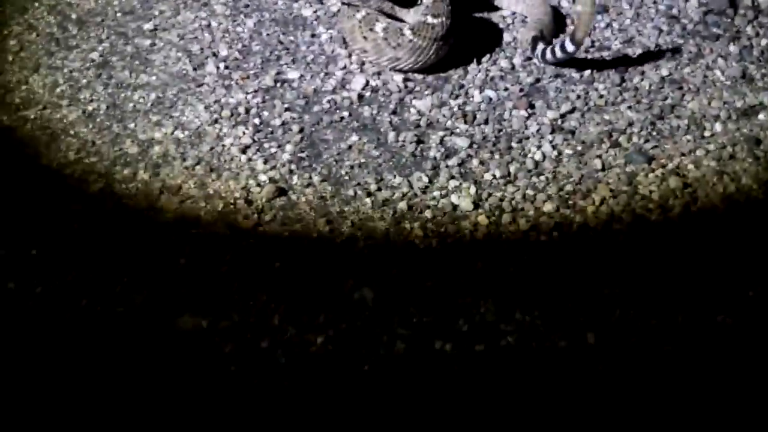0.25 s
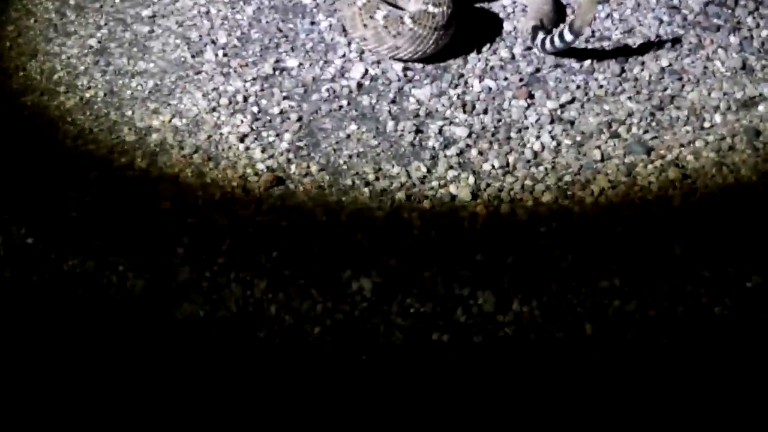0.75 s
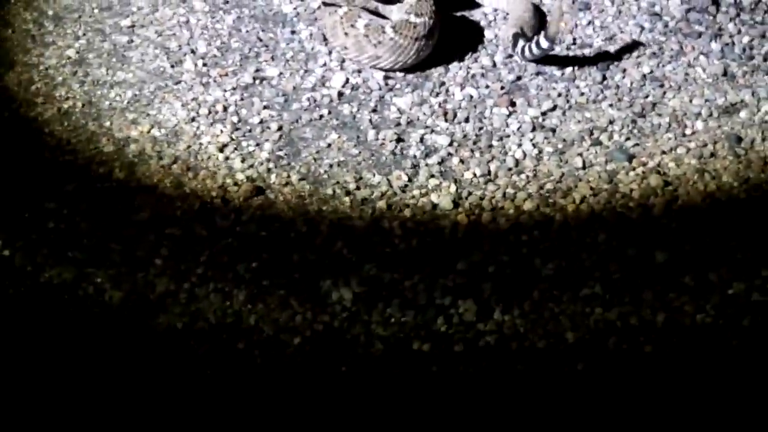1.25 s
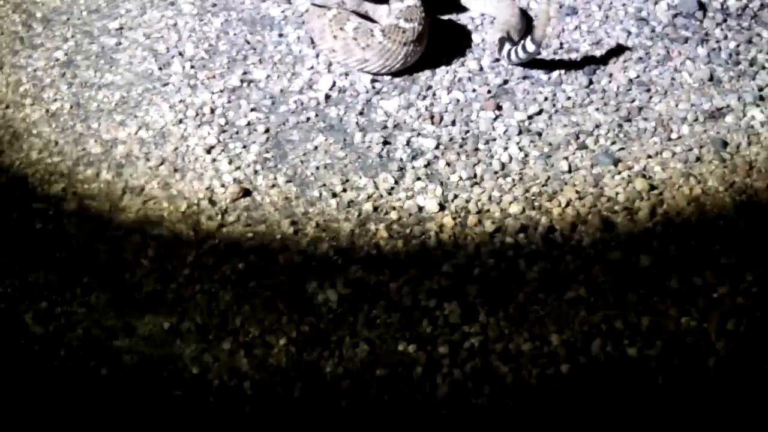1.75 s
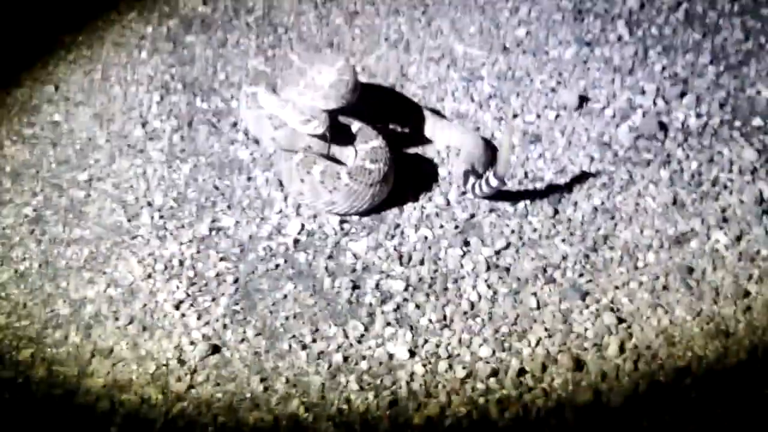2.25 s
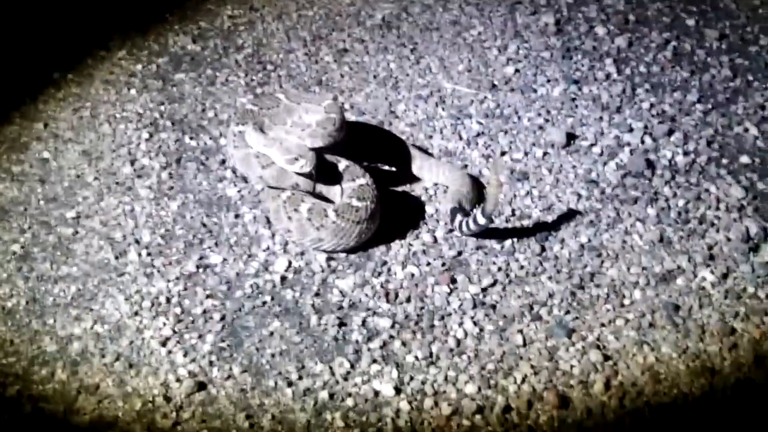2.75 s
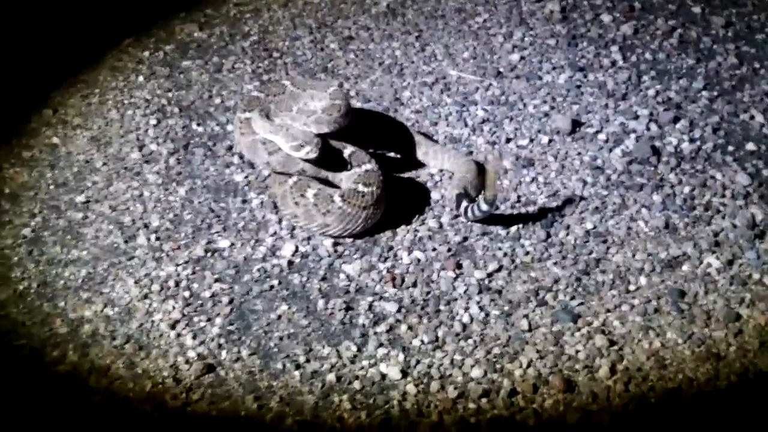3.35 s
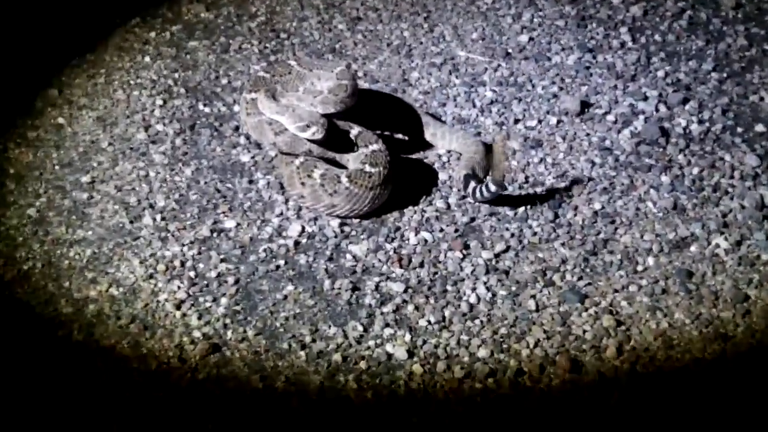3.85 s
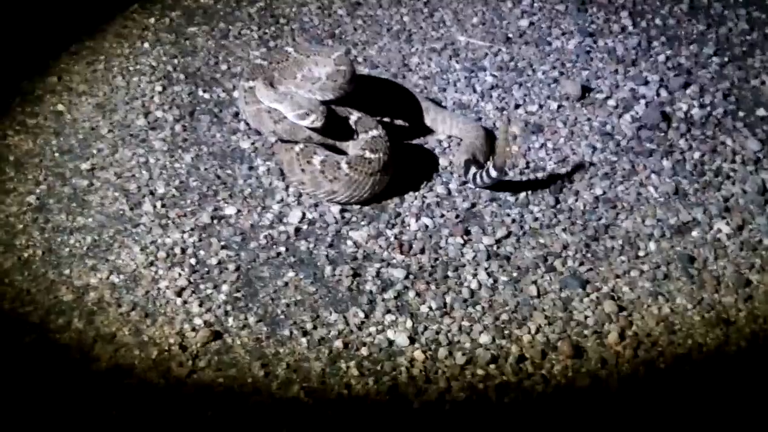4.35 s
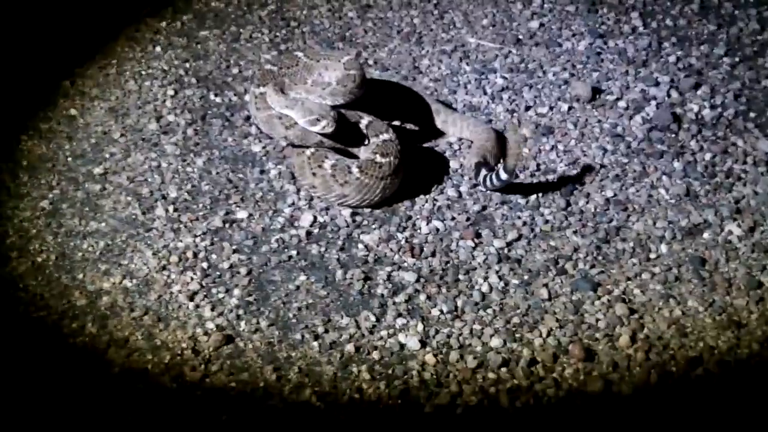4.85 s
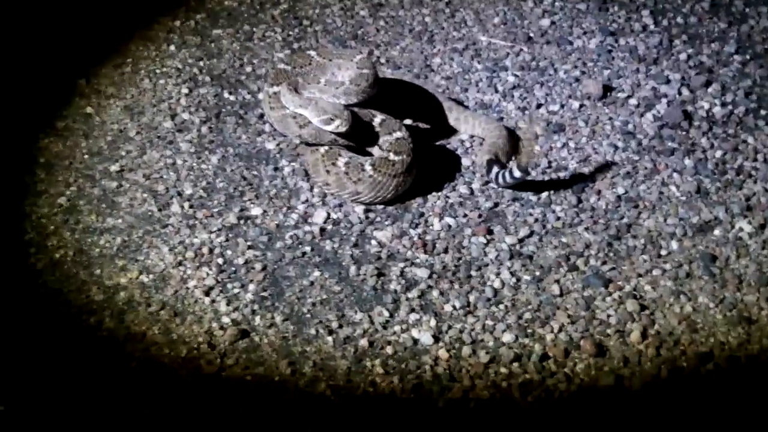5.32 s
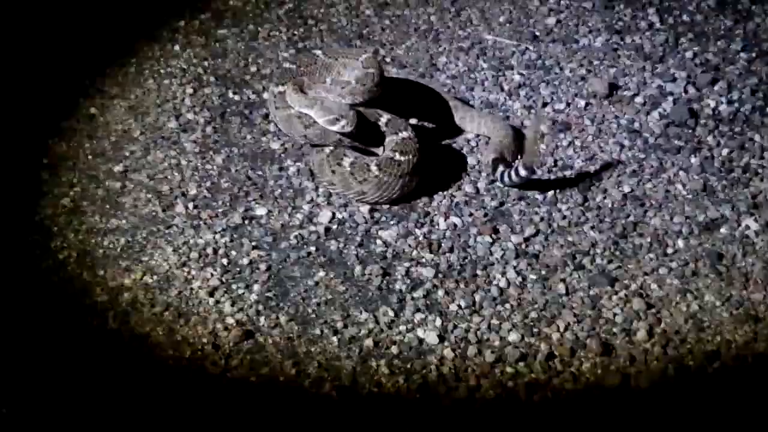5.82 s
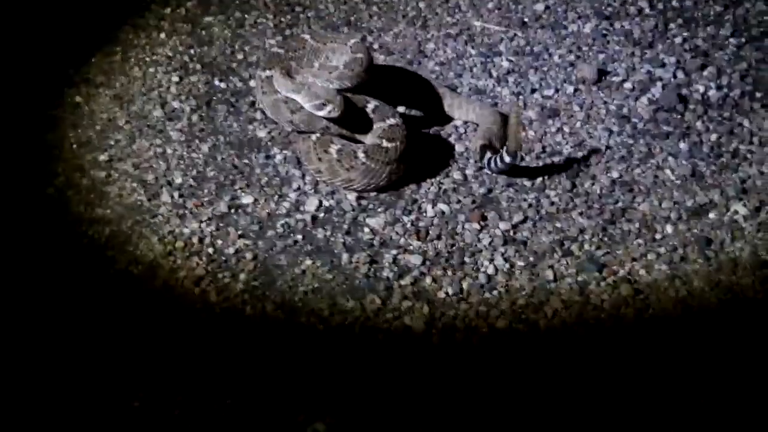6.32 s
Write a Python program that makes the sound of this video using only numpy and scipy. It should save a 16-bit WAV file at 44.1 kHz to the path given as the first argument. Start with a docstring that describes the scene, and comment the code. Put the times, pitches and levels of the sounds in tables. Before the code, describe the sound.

A rattlesnake on gravel buzzes its tail without stopping, a loud, dry, sizzling rattle. It starts dense and nearly smooth, then from about the middle turns into a rapid flutter of separate bursts, slightly duller. A few gravel clicks and soft thuds come near the start, with small crunches toward the end. Quiet night air and a barely audible distant idling engine lie beneath. Close, dry outdoor pickup with no echo.

```python
"""A coiled rattlesnake shakes its tail on gravel at night: noise bursts of clashing hollow segments, one per swing.
At first the bursts run together, later deeper gaps open between them. The microphone tilts toward the snake early on.
Gravel clicks and crunches under a shifting foot, as short puffs of noise and low damped thuds.
Far off a parked engine idles, a few wavering sines; the night air is a faint rumble and hiss of shaped noise."""
import sys
import numpy as np
from scipy import signal
from scipy.fft import rfft, irfft, next_fast_len
from scipy.io import wavfile
from scipy.ndimage import uniform_filter1d, map_coordinates

SR = 44100
rng = np.random.default_rng(int(sys.argv[2]) if len(sys.argv) > 2 else 0)


def put_to_file(sound):
    """Save the sound as 16-bit audio at rate SR, in the file named by the first command-line argument."""
    columns = np.atleast_2d(sound).T  # one column per channel
    safe = np.clip(columns, -1, 1)
    whole_steps = np.round(safe * 32767)
    wavfile.write(sys.argv[1], SR, whole_steps.astype(np.int16))


N = 290178  # samples


def amp(db):
    """Amplitude ratio of a level in dB."""
    return 10 ** (np.asarray(db) / 20)


def unit(x):
    """x brought to rms 1."""
    return x / np.sqrt(np.mean(x ** 2) + 1e-20)


def curves(rows):
    """One value per sample for each column after the time."""
    time_s, *columns = np.transpose(rows)
    return [np.interp(np.arange(N) / SR, time_s, column) for column in columns]


def wobble(rate):
    """A smooth random curve, rate knots a second."""
    coarse = np.arange(0, N + 32, 32)  # every 32nd sample is enough
    knots = rng.standard_normal(int(N * rate / SR) + 4)
    return np.interp(np.arange(N), coarse, map_coordinates(knots, [coarse * rate / SR]))


def filtered(x, response):
    """x times a response of frequency."""
    m = next_fast_len(N + 8192)
    return irfft(rfft(x, m) * response(np.fft.rfftfreq(m, 1 / SR)), m)[..., :N]


def coloured(x, points):
    """x shaped by (Hz, dB) points on a log axis, brought to rms 1."""
    f, db = np.transpose(points)
    return unit(filtered(x, lambda hz: amp(np.interp(np.log(hz + 1), np.log(f), db))))


def steady(db):
    """Gain that follows db while its rms over an eighth of a second stays even."""
    return amp(db) / np.sqrt(np.abs(uniform_filter1d(amp(2 * db), SR // 8)))


def clashes(per_s, scatter, spread_db, length):
    """Envelope of segments knocking one after another, unevenly spaced and of uneven strength."""
    order = np.arange(int(per_s * N / SR))
    shift, size = rng.uniform(-0.84, 1, (2, len(order)))
    at = np.clip((order + scatter * shift) * SR / per_s, 0, N - 1).astype(int)
    t = np.arange(-SR // 100, SR // 100) / SR
    swell = np.exp(-(2 * t / length) ** 2)
    energy = np.bincount(at, amp(2 * spread_db * size), N)
    return unit(np.sqrt(np.abs(signal.fftconvolve(energy, swell, "same"))))


# A narrow dip in the buzz, one row before and one after the microphone tilts:
# pitch_hz, half_width_hz (to 1/e), depth_share (0-1)
TILT_DIPS = [(4040, 92, 0.69), (4200, 61, 0.36)]
TILT_S, TILT_SCALE_S = 2.05, .15  # middle of the tilt, time scale of its smooth step


def microphone_tilt(walls):
    """Tilting the microphone toward the snake fades the buzz from one narrow dip to another."""
    before, after = [filtered(walls, lambda hz: 1 - depth * np.exp(-((hz - mid_hz) / width_hz) ** 2))
                     for mid_hz, width_hz, depth in TILT_DIPS]
    tilted = .5 + .5 * np.tanh((np.arange(N) / SR - TILT_S) / TILT_SCALE_S)
    return before + tilted * (after - before)


# How hard the tail shakes: time_s, level_db (segment walls), gap_depth_db (quiet between bursts)
SHAKE = [(0, -29.5, 1.5), (.25, -30.5, 6.5), (.52, -29, 2.5), (.67, -31.5, 5), (1.0, -29, 2.5),
         (1.25, -28.5, 2.5), (1.7, -28.5, 2.5), (2.0, -29.5, 5), (2.35, -30, 6.5), (2.66, -30, 5.5),
         (2.8, -30, 13), (2.97, -31, 8.5), (3.14, -30.5, 18), (3.36, -31, 10), (3.52, -29.5, 14.5),
         (3.63, -31, 7.5), (3.88, -31, 14.5), (4.1, -31, 8), (4.4, -31, 13.5), (4.7, -31.5, 9),
         (4.92, -31, 12), (5.64, -31, 6.5), (5.83, -32, 12), (6.0, -31, 8.5), (6.45, -30, 7.5),
         (6.58, -31, 10.5)]
# Tail swings done so far, before a small random shift, whole numbers near mid burst: time_s, swings
SWINGS = [(0.0, -0.08), (0.36, 9.57), (0.44, 11.42), (0.6, 16.25), (0.96, 25.95), (1.04, 28.66),
          (1.6, 45.51), (1.84, 51.67), (2.16, 60.89), (2.59, 73.34), (2.67, 75.84), (2.83, 80.24),
          (3.07, 87.5), (3.23, 92.18), (3.91, 112.49), (4.27, 122.36), (4.79, 137.98), (4.95, 142.47),
          (5.31, 153.4), (5.43, 156.72), (6.27, 182.43), (6.58, 190.95)]
# Colour of the segment walls' buzz: pitch_hz, level_db (relative); above 7 kHz it falls away steeply
WALL_MODES = [(1800, -34), (2900, -28), (3200, -15), (3470, -14), (3700, -5.5), (4050, -4), (4180, -5),
              (4600, -0.5), (5200, -1), (5700, -6), (6100, -9), (7200, -22.5), (7900, -65), (9000, -70)]
# Resonance of the hollow inside the segments: pitch_hz, level_db (relative)
HOLLOW_MODES = [(710, -32), (1200, -23), (1900, -14), (2150, -12.5), (2450, -3.5), (2850, -3.5),
                (3170, -2.5), (3500, -6.5), (4700, -5.5), (7900, -120)]
# Colour of the upper buzz: pitch_hz, level_db (relative); the treble has a narrow dip near 13.4 kHz
UPPER_MODES = [(7600, -45), (8050, -30), (8350, -9), (9000, -6), (10000, 0), (10900, -5), (12300, -8),
               (12750, -16), (13400, -27), (14200, -16), (14950, -14), (15400, -34)]
GAP_WANDER = .1  # the gap depth drifts by this share
BODY_DB, BODY_THINS = -11.5, .35  # hollow against the walls; dB lost per dB of gap depth


def rattle():
    """Segments clash densely through most of each swing and fall quiet at its turn."""
    (level_db, open_db), (swing,) = curves(SHAKE), curves(SWINGS)
    level_db = level_db + 0.61 * wobble(7)
    gap_db = open_db * np.clip(1 + GAP_WANDER * wobble(7), 0, 2)
    swing = swing - .01 + 0.026 * wobble(25)  # no two swings break alike

    quiet = .5 - .5 * np.tanh(5.2 * (np.cos(2 * np.pi * swing) + 0.31))
    lull = .5 + .5 * np.cos(2 * np.pi * (swing - .06))
    burst_db = -gap_db * quiet - 1.5 * lull ** 12 + 0.84 * wobble(40)  # a short lull splits the burst

    # the added constants are a steady hiss beneath the separate clashes
    contact = clashes(480, scatter=0.52, spread_db=6.0, length=0.0014)
    noise = rng.standard_normal((3, N))
    walls = coloured(noise[0] * (contact + 1.08) * steady(burst_db), WALL_MODES)
    walls = microphone_tilt(walls)
    hollow = coloured(noise[1] * (contact + 0.94) * steady(0.91 * burst_db), HOLLOW_MODES)
    upper = coloured(noise[2] * (contact + 2.7) * steady(0.71 * burst_db), UPPER_MODES)

    flicker_db = 1.3 * wobble(6.2)  # the treble flickers
    open_db = uniform_filter1d(open_db, SR)  # the colour follows the gaps slowly
    body_db = BODY_DB - BODY_THINS * open_db + 0.5 * wobble(6)
    upper_db = -21.5 - 0.24 * open_db + flicker_db  # duller once the gaps open
    return amp(level_db) * (walls + amp(body_db) * hollow + amp(upper_db) * upper)


# Grit scuffs and ticks: middle_s, level_db (rms, at full swell), centre_hz, spread_octaves, length_s
GRAVEL = [(0.3254, -36, 600, 3, .005), (.3262, -27, 2700, 0.49, .003), (0.354, -30, 2900, 0.28, .004),
          (0.377, -47, 620, 0.68, 0.0066), (0.391, -41.5, 900, 2.4, .0025), (.41, -51, 880, .6, .004),
          (1.892, -51.5, 100, 1.2, 0.088), (5.744, -43, 573, 0.42, 0.011), (5.751, -39.5, 2000, 1.1, 0.025),
          (5.755, -38, 900, 1.9, 0.0079), (5.796, -45, 1500, .9, .008), (5.83, -35.5, 2540, 1.4, 0.016),
          (5.829, -47.5, 840, 0.45, 0.044), (5.852, -47, 1100, 1.6, .035), (6.326, -37.5, 1000, 1.4, .0025),
          (6.415, -47, 750, 1.1, .004), (6.431, -50, 600, .7, .007), (6.461, -39.5, 1100, 2.6, 0.0043),
          (6.562, -46, 600, 1.1, .011)]
# Weight on the ground: start_s, level_db (at the start of the decay), pitch_hz, t60_s
THUDS = [(.326, -35.5, 260, 0.038), (.331, -32.5, 80, 0.055), (.542, -30, 192, 0.021),
         (2.332, -37, 198, .034), (6.33, -41, 230, 0.025), (6.459, -39, 220, .03), (6.466, -36, 120, .035)]
CLICK = 19  # a sharp click at the middle of each puff: one spike added to the noise, before the band


def underfoot():
    """Each scuff is a puff of noise in the band of its stones; each thud one low damped push."""
    out, t = np.zeros(N + SR), np.arange(SR // 5) / SR
    f = np.fft.rfftfreq(len(t), 1 / SR) + 1
    for s, db, hz, octaves, length in GRAVEL:
        band = np.exp(-(2 * np.log2(f / hz) / octaves) ** 2 / 2)
        # single stones catch and let go
        grains = amp(5.5 * np.repeat(rng.standard_normal(len(t) // 60), 60))
        click = CLICK * (t == t[len(t) // 2])
        grit = irfft(rfft(rng.standard_normal(len(t)) * grains + click) * band, len(t))
        swell = np.exp(-(2 * (t - t.mean()) / length) ** 2)
        scuff = amp(db) * unit(grit * swell) * np.sqrt(np.mean(swell ** 2))
        out[round((s - t.mean()) * SR):][:len(t)] += scuff
    for s, db, hz, t60 in THUDS:
        out[round(s * SR):][:len(t)] += amp(db - 60 * t / t60) * np.sin(2 * np.pi * hz * t)
    return out[:N]


IDLE_HZ = 26.17  # pitch of engine order 1, about which it wanders
# Harmonics of the distant idle: engine_order, level_db (rms)
IDLE = [(1, -48), (2, -71), (3, -63), (4, -65), (5, -62), (6, -69.5), (12, -74), (13, -71.5)]
# Faint tones above the idle: pitch_hz, level_db (rms)
WHINE = [(424, -90), (483, -73), (1017, -69.5), (1271, -70.5)]


def engine():
    """Orders of the far-off idle share one slightly unsteady turn, with a few faint tones above."""
    turn = 2 * np.pi * np.cumsum(IDLE_HZ + 0.077 * wobble(2.5)) / SR
    hum = sum(amp(db + 0.67 * wobble(3.1)) * np.sin(order * turn + 2 * np.pi * rng.random())
              for order, db in IDLE)
    tones = sum(amp(db + 0.51 * wobble(4.2)) * np.sin(2 * np.pi * np.cumsum(hz + 1.544 * wobble(6)) / SR)
                for hz, db in WHINE)
    return np.sqrt(2) * (hum + tones)  # sine peak from rms


# Colour of the night air: pitch_hz, level_db (relative)
NIGHT = [(18, -9.5), (30, 1), (50, -5), (76, -23), (132, -8), (238, -19.5), (482, -20), (672, -25.5),
         (1030, -20), (1630, -22.5), (2500, -16.5), (3250, -14.5), (5500, -120)]


def night():
    """Distant rumble and hiss, drifting a little."""
    level_db = -50 + 0.45 * wobble(3.22) + 1.5 * wobble(12)
    return amp(level_db) * coloured(rng.standard_normal(N), NIGHT)


def scene():
    """Snake, foot, far engine and night air heard together at one microphone."""
    return (rattle() + underfoot() + engine() + night())[None]


TOP_HZ = 15400


def record(dry):
    """The microphone keeps nothing above its band limit."""
    return filtered(dry, lambda hz: hz < TOP_HZ)


dry = scene()
out = record(dry)
put_to_file(out)
```